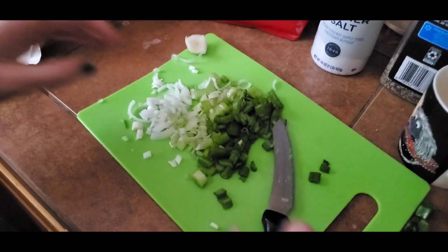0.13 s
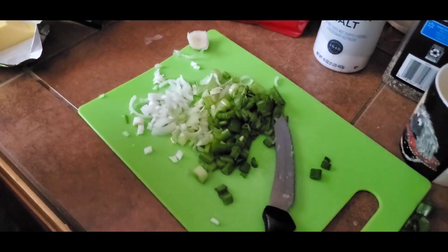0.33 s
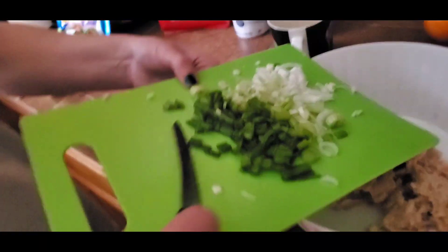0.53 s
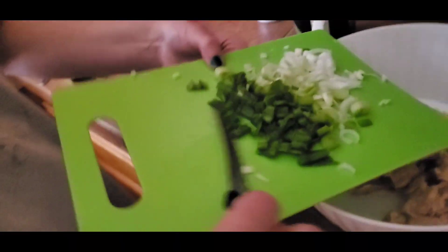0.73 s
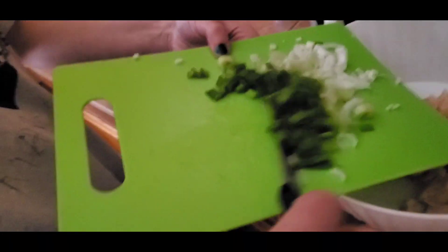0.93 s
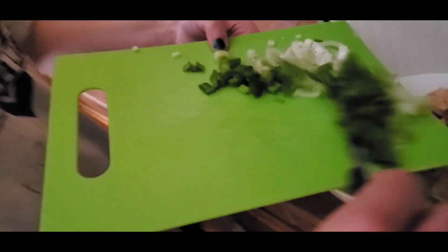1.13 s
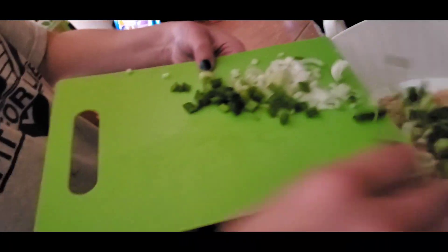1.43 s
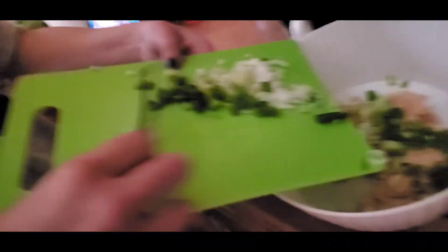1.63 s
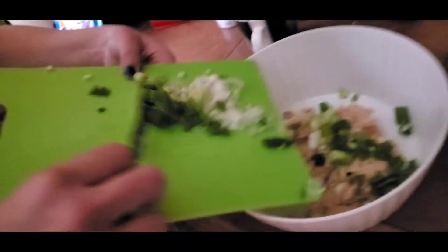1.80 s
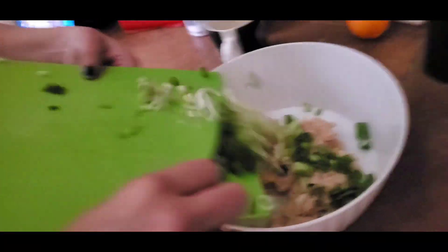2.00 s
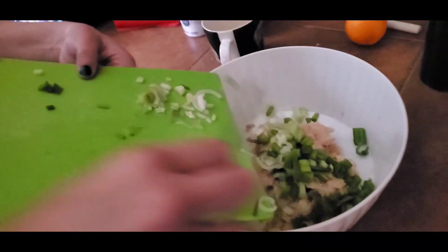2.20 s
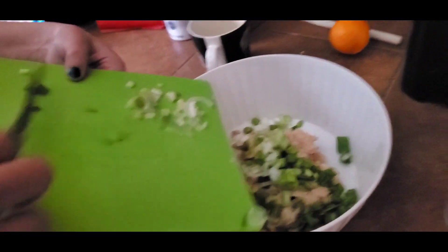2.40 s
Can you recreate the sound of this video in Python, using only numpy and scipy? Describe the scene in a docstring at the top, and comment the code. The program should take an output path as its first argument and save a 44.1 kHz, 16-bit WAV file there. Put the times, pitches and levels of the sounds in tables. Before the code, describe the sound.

A knife scrapes a plastic chopping board, heard close in a small kitchen. The board clacks hard on the counter at 0.2 seconds. Dull knocks at 0.7 lead into a long, hollow, hissing scrape until 1.5, ending with chopped vegetables plopping into a bowl. Light taps follow, then a shorter scrape around 2.1 and pieces pattering until 2.5. An appliance hums faintly behind.

```python
"""A small kitchen, a stereo pair close to the counter, the work a little right of centre.
A plastic chopping board is lifted off the counter with a hard clack and held over a bowl. A knife knocks
on it and scrapes across it twice: the edge catches and slips, the board rings hollow, the blade hisses.
Chopped vegetables plop and patter into the bowl; behind it all an appliance hums in the room air."""
import sys
import numpy as np
from scipy import signal
from scipy.fft import rfft, irfft, next_fast_len
from scipy.io import wavfile
from scipy.ndimage import map_coordinates

SR = 44100
rng = np.random.default_rng(int(sys.argv[2]) if len(sys.argv) > 2 else 0)


def dump_mix(stems):
    """Bounce the given channels to the path in sys.argv[1] as a 16-bit WAV at rate SR."""
    frames = np.atleast_2d(stems).T  # one column per channel
    limited = np.clip(frames, -1, 1)  # hard clip at full scale
    pcm = np.round(limited * 32767).astype(np.int16)
    wavfile.write(sys.argv[1], SR, pcm)


N = 112454
T = np.arange(SR // 3) / SR  # time within one blow

# resonances of the board, and of the blade pressed on it: pitch_hz, width_hz, gain_db
BOARD_MODES = [(296.4, 90, -1), (430, 46, -1.5), (490.7, 50, -3), (567, 16.6, 0.5), (696, 34.3, 2),
               (769.6, 24.5, 1), (871, 66, -4), (990, 33, 1.5), (1112, 74, -2.5)]
BLADE_MODES = [(1390, 370, -3), (1584, 122, 1.5), (1760, 160, 0), (2170, 180, -4.5), (2360, 56, 0.5),
               (2680, 130, -2.5), (3183, 310, -6), (3617, 145, -1), (4100, 1070, -10)]
# the knife's nudge, long sweep, way back and last sweep: time_s, ring_db, rasp_db, hiss_db
STROKES = [(.59, -64.5, -74, -100), (.69, -69, -68.5, -69.5), (.772, -57, -60.5, -74),
           (.799, -29, -46.5, -57), (.822, -34.5, -48.5, -58), (.855, -59, -81, -89),
           (.886, -31.5, -42.5, -54), (.9, -32.5, -38.5, -48), (.99, -29, -33, -40),
           (1.045, -26, -32.5, -40), (1.095, -35, -42, -53.5), (1.15, -33, -37.5, -44.5),
           (1.24, -29, -33, -37), (1.33, -32.5, -36, -40), (1.425, -31.5, -35, -40), (1.468, -40, -43, -46),
           (1.495, -50, -66, -64), (1.59, -62.5, -79, -74), (1.63, -60, -51, -65), (1.72, -53.5, -72, -66),
           (1.83, -58, -69, -80), (1.88, -80, -61, -50), (1.97, -48, -63.5, -54.5), (2.03, -51.5, -63, -45),
           (2.082, -47, -58, -48), (2.094, -35, -49, -46), (2.14, -32.5, -44.5, -44.5),
           (2.185, -45, -55, -52), (2.215, -42, -45, -52), (2.29, -50.5, -54.5, -61),
           (2.44, -50.5, -55.5, -73), (2.55, -62, -79, -84)]
# board resonances favoured by the blade's place, higher towards the edge: time_s, centre_hz
FAVOURED_PITCH = [(.8, 555), (1.08, 613), (1.22, 500), (1.29, 775), (1.42, 830), (2.09, 430), (2.16, 593)]
# the rasp between the microphones: time_s, left_minus_right_db
RASP_PAN = [(.9, -3.5), (1.15, -4), (1.4, -8), (1.7, -8)]
# weight of the fine sizzle in the hiss, greater under a light hand: time_s, weight (0-1)
SIZZLE_WEIGHT = [(1.5, 0.23), (1.85, 0.9)]
# the board hits the counter and rebounds: start_s, level_db, relative_grit_db
CLACKS = [(0.2283, -11, -11.5), (0.2448, -15, -1.5), (0.2688, -21.5, -22.5), (0.294, -32, -26)]
# the plastic's ring at each clack: pitch_hz, gain_db, t60_s
CLACK_MODES = [(300, -24.5, 0.17), (1269, -13, 0.15), (1714, -26.5, 0.088), (2003, -18, 0.15),
               (2284, -12.5, 0.05), (2890, -18, 0.11), (3586, -22, 0.083)]
# dull knocks on board and bowl, the first followed by its quick echo off a near wall:
# start_s, level_db, pitch_hz, left_minus_right_db
KNOCKS = [(0.6974, -17, 603, -0.5), (.721, -25.5, 665, -5), (0.778, -27.5, 650, -1), (.911, -22, 720, -1),
          (1.253, -24.5, 706, -2), (1.6026, -24, 614, -4), (2.088, -29.5, 430, -6)]
# ticks of the blade and falling pieces: start_s, level_db, pitch_hz, tip_db, left_minus_right_db
TICKS = [(.417, -58, 2960, 12, -8.5), (0.893, -23.5, 1760, -16, 1), (0.94, -19, 1800, -2.5, -0.5),
         (1.134, -22, 1630, -14, -7), (1.6035, -31.5, 1540, -16, -9), (1.612, -34.5, 1740, -5, -9.5),
         (1.666, -37, 1580, -37, -6), (1.692, -26, 2120, -7, -7.5), (1.826, -52.5, 2400, 8.5, -11),
         (1.973, -43, 1760, -5, -13), (2.237, -22, 1890, -36, -3.5), (2.263, -42, 3380, -34, 0),
         (2.289, -28.5, 1620, -17, -5), (2.3259, -27.5, 2500, -29, -4), (2.343, -29.5, 1490, -12, -5),
         (2.369, -24, 1380, -22, -7), (2.396, -30.5, 2080, -14, -11), (2.432, -32.5, 1410, -21, -5),
         (2.513, -42, 1310, -30, -6)]
# the counter's thud, one short hollow ring of the board as the knife catches, and clumps plopping
# into the bowl: start_s, level_db, pitch_hz, t60_s
BUMPS = [(0.262, -31.5, 104, 0.2), (1.3395, -15.5, 720, 0.063), (1.379, -26.5, 145, 0.057),
         (1.438, -33.5, 127, 0.12), (1.51, -28, 160, 0.038), (1.871, -29.5, 536, 0.047),
         (2.2665, -25.5, 535, 0.038)]
# the appliance's upper tones: pitch_hz, relative_db
HUM_TONES = [(186, -57.5), (277, -62.5)]
# swell of its deepest tone: time_s, level_db
MOTOR_LEVEL = [(0, -77), (.5, -62.5), (.7, -59.5), (1.3, -53), (1.7, -60), (2.15, -53.5), (2.55, -54.5)]
# the kitchen's decay: frequency_hz, t60_s
ROOM_DECAY = [(800, 0.27), (2000, 0.21), (6000, 0.2), (14000, 0.13)]
# tone colours of the scrape's parts, the blows and the room air: frequency_hz, gain_db
HISS_COLOUR = [(1500, -46), (3500, -3), (5000, -7), (7000, -9), (9800, -3), (11800, -1), (13500, -6.5),
               (15700, -4.5)]
SIZZLE_COLOUR = [(2700, -26), (3600, -6), (4600, -20), (8000, -16), (12800, 0), (15700, -4)]
PUSH_COLOUR = [(120, -3), (300, 5), (1100, -5.5), (1400, 7), (8000, -89)]
RASP_COLOUR = [(500, 3), (1200, 4), (1600, 4.5), (4500, -5.5), (9000, -25)]
CLACK_COLOUR = [(150, -6.5), (500, -2.5), (1050, -8.5), (1500, 4.5), (2700, -2), (4300, -17), (7500, -23.5),
                (11500, -13), (15500, -45.5)]
GRIT_COLOUR = [(2000, -16.5), (5000, -5), (8400, -8), (10000, -5), (12000, -13.5), (15500, -13)]
KNOCK_COLOUR = [(120, -14), (300, 4), (750, 0), (1100, -9), (9000, -45.5)]
TICK_COLOUR = [(800, 24.5), (2800, 2), (4500, -9), (15000, -8)]
AIR_COLOUR = [(25, -16), (70, -9), (135, -15.5), (190, -13.5), (400, -16), (600, -27), (1100, -43.5),
              (2000, -44), (7000, -63), (11300, -52), (15500, -59.5)]


def knife_scrape(slips_per_s=950, slip_spread_db=3.5, catches_per_s=110, catch_db=1.1):
    """Close up, the edge catches and slips; the same slips drive board ring, blade rasp and hiss."""
    sizes = amp(slip_spread_db * np.minimum(rng.exponential(size=N), 3))
    slipping = rng.random(N) < slips_per_s / SR
    slips = unit_rms(slipping * sizes * rng.choice([-1, 1], N))
    # the blade bites and lets go in quick, shallow surges
    surges = map_coordinates(rng.standard_normal(N // 50), [np.arange(N) * catches_per_s / SR])
    bite = amp(catch_db * surges)
    strokes = np.array(STROKES)
    ring_gain, rasp_gain, hiss_gain = [bite * amp(curve(strokes[:, [0, k]], left=-120)) for k in (1, 2, 3)]

    def friction(smooth_db, side_db):
        return slips + amp(smooth_db) * noise(N, side_db)

    ring = ring_gain * board_ring(friction(smooth_db=-10, side_db=7.5))
    rasp = rasp_gain * blade_rasp(friction(smooth_db=0.5, side_db=10))
    hiss = hiss_gain * edge_hiss(friction(smooth_db=8, side_db=2.5))
    return (room(ring * pan(-2.6), wet_db=-14.5, side_db=-0.5)
            + room(rasp * pan(curve(RASP_PAN)), wet_db=-10, side_db=-10.5)
            + room(hiss * pan(-3.4), wet_db=-9, side_db=-13.5))


def board_ring(friction, spread_octaves=0.36, floor_db=-16, octave_db=-8):
    """The board rings hollow, most in the region the blade's place favours and an octave above it."""
    push = coloured(friction, PUSH_COLOUR)
    favoured_hz = curve(FAVOURED_PITCH)
    near = lambda hz: np.exp(-0.5 * (np.log2(hz / favoured_hz) / spread_octaves) ** 2)
    favour = lambda hz: amp(floor_db) + near(hz) + amp(octave_db) * near(hz / 2)
    return unit_rms(sum((-1) ** k * favour(mode[0]) * resonate(push, [mode])
                        for k, mode in enumerate(BOARD_MODES)))


def blade_rasp(friction):
    """Friction shakes the resonances of the pressed blade."""
    return unit_rms(coloured(resonate(friction, BLADE_MODES), RASP_COLOUR))


def edge_hiss(friction):
    """The edge's rough hiss gives way to a finer sizzle as the pressure lightens."""
    rough = unit_rms(coloured(friction, HISS_COLOUR))
    sizzle = unit_rms(coloured(noise(N, side_db=2.5), SIZZLE_COLOUR))
    weight = curve(SIZZLE_WEIGHT)
    return np.sqrt(1 - weight ** 2) * rough + weight * sizzle


def board_clacks(echo_s=0.001639, echo_db=7):
    """Hard plastic on the counter: a crack, a short ring and a gritty skid at each contact."""
    out = np.zeros((2, N))
    for start_s, db, grit_db in CLACKS:
        crack = unit_peak(coloured(contact(scatter_db=5, t60=0.029, side_db=-2.5), CLACK_COLOUR))
        ring = sum(amp(mode_db + 2 * rng.standard_normal()) * fade(t60) * np.sin(2 * np.pi * hz * T)
                   for hz, mode_db, t60 in CLACK_MODES)
        skid = noise(len(T), side_db=-3) * fade(0.015) * rise(0.0011)
        grit = unit_peak(coloured(skid, GRIT_COLOUR))
        add(out, start_s, amp(db) * ((crack + amp(-5) * ring) * pan(-3.7) + amp(grit_db) * grit))
    # a close surface throws the first clack at the right microphone
    start_s, db, _ = CLACKS[0]
    impulse = 1.0 * (T == 0)
    echo = unit_peak(resonate(resonate(impulse, [(2800, 1340, 0)]), [(2500, 1800, 0)]))
    add(out, start_s + echo_s, amp(db + echo_db) * echo * np.array([[0.15], [1]]))
    return room(out, wet_db=-5.5, side_db=3.5)


def dull_knocks():
    """Soft blows and the first one's wall echo: each a dull pulse with the board's hollow ring."""
    out = np.zeros((2, N))
    for start_s, db, hz, pan_db in KNOCKS:
        pulse = resonate(contact(scatter_db=1.5, t60=0.058, side_db=-6), [(hz, 340, 0)])
        ring = amp(-11.5) * resonate(pulse, BOARD_MODES)
        add(out, start_s, amp(db) * pan(pan_db) * unit_peak(coloured(pulse + ring, KNOCK_COLOUR)))
    return room(out, wet_db=-7.5, side_db=0)


def light_ticks():
    """The blade and falling pieces tap: each a pair of short resonances with a bright tip."""
    out = np.zeros((2, N))
    for start_s, db, hz, tip_db, pan_db in TICKS:
        tap = contact(scatter_db=9, t60=0.02, side_db=-2)
        ring = resonate(tap, [(hz, 500, 0), (1.79 * hz, 600, -2)])
        body = unit_peak(coloured(ring, TICK_COLOUR))
        tip = unit_peak(coloured(contact(scatter_db=5, t60=0.014, side_db=0), GRIT_COLOUR))
        add(out, start_s, amp(db) * pan(pan_db) * (body + amp(tip_db) * tip))
    return room(out, wet_db=-9, side_db=3)


def round_bumps():
    """Quickly damped tones: the counter thuds, the board rings once as the knife catches, clumps plop."""
    out = np.zeros((2, N))
    for start_s, db, hz, t60 in BUMPS:
        add(out, start_s, amp(db) * np.sin(2 * np.pi * hz * T) * fade(t60) * rise(0.00075))
    return out


def appliance_hum(motor_hz=62.9, wavers_per_s=7.06):
    """Wavering tones in the background; the deepest swells and sinks off to the right."""
    t = np.arange(N) / SR

    def tone(hz, waver_rad):
        wobble = map_coordinates(rng.standard_normal(200), [t * wavers_per_s], mode="wrap")
        return np.sqrt(2) * np.sin(2 * np.pi * hz * t + waver_rad * wobble)

    upper = sum(amp(db + 2.5) * tone(hz, waver_rad=0.76) for hz, db in HUM_TONES)
    return upper + amp(curve(MOTOR_LEVEL)) * tone(motor_hz, waver_rad=0.67) * pan(-11)


def room_air():
    """A faint, steady, low rush at both microphones."""
    return amp(-49.5) * unit_rms(coloured(noise(N, side_db=-2.5), AIR_COLOUR)) * pan(-1.84)


def room(x, wet_db, side_db):
    """Add the kitchen's short tail, which reaches the pair 4 ms late and loses its treble first."""
    hz, t, spectrum = signal.stft(noise(len(T), side_db), SR, nperseg=256)
    decay = amp(-60 * t / along(ROOM_DECAY, hz)[:, None])
    tail = signal.istft(spectrum * decay, SR, nperseg=256)[1]
    tail = np.pad(tail, ((0, 0), (SR // 250, 0)))
    return x + amp(wet_db) * signal.fftconvolve(x, tail / np.linalg.norm(tail[0]), axes=1)[:, :N]


def contact(scatter_db, t60, side_db):
    """One sharp push and the dying rattle that follows it."""
    rattle = noise(len(T), side_db) * fade(t60)
    return (T == 0) + amp(scatter_db) * rattle / np.linalg.norm(rattle[0])


def noise(size, side_db):
    """Mid-side noise; more side makes it wider."""
    mid, side = rng.standard_normal((2, size))
    return unit_rms(np.array([mid + amp(side_db) * side, mid - amp(side_db) * side]))


def resonate(x, modes):
    """x through parallel (pitch_hz, width_hz, gain_db) resonances of alternating sign."""
    return filtered(x, lambda f: sum((-1) ** k * amp(db) * 1j * f * width / (hz**2 - f**2 + 1j * f * width)
                                     for k, (hz, width, db) in enumerate(modes)))


def coloured(x, points, size=2 ** 13):
    """x through a minimum-phase filter shaped by (frequency_hz, gain_db) points."""
    cepstrum = irfft(np.log(amp(along(points, np.fft.rfftfreq(size, 1 / SR)))))
    cepstrum[1:size // 2] *= 2
    cepstrum[size // 2 + 1:] = 0
    kernel = irfft(np.exp(rfft(cepstrum)))
    return signal.fftconvolve(np.atleast_2d(x), kernel[None], axes=1)[:, :x.shape[-1]]


def filtered(x, response):
    """x times a complex response of frequency."""
    size = next_fast_len(x.shape[-1] + SR // 4, True)
    return irfft(rfft(x, size) * response(np.fft.rfftfreq(size, 1 / SR)), size)[..., :x.shape[-1]]


def along(points, hz):
    """Interpolate (frequency_hz, value) points on a log axis."""
    freqs, values = np.transpose(points)
    return np.interp(np.log(hz + 1), np.log(freqs + 1), values)


def curve(rows, **ends):
    """One value per sample from (time_s, value) rows."""
    return np.interp(np.arange(N) / SR, *np.transpose(rows), **ends)


def amp(db):
    return 10 ** (np.asarray(db) / 20)


def unit_rms(x):
    return x / np.sqrt(np.mean(x ** 2) + 1e-20)


def unit_peak(x):
    return x / np.abs(x).max()


def rise(attack_s):
    return 1 - np.exp(-T / attack_s)


def fade(t60):
    return np.exp(-np.log(1000) * T / t60)


def pan(left_minus_right_db):
    return amp(np.array([[0.5], [-0.5]]) * left_minus_right_db)


def add(out, start_s, x):
    i = int(start_s * SR)
    out[:, i:i + x.shape[-1]] += x[..., :N - i]


def scene():
    """The work at the counter in front, the kitchen behind."""
    counter = knife_scrape() + board_clacks() + dull_knocks() + light_ticks() + round_bumps()
    return counter + appliance_hum() + room_air()


def record(dry):
    """The recorder cuts off steeply at 15650 Hz."""
    return filtered(dry, lambda hz: 1 / (1 + (hz / 15650) ** 200))


dry = scene()
out = record(dry)
dump_mix(out)
```